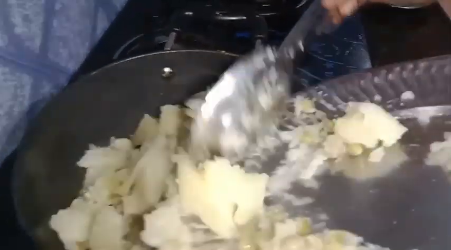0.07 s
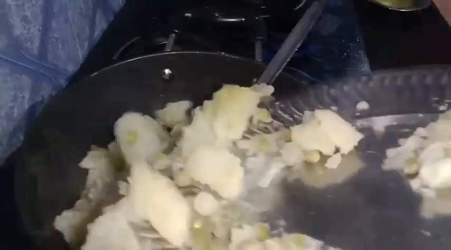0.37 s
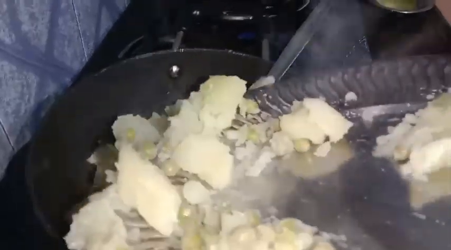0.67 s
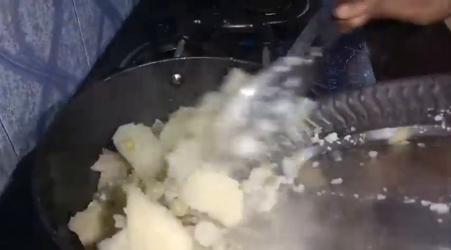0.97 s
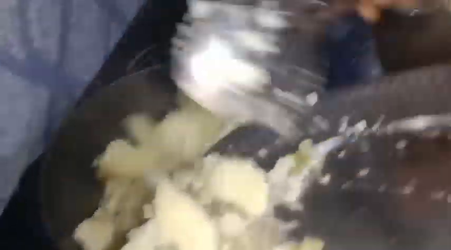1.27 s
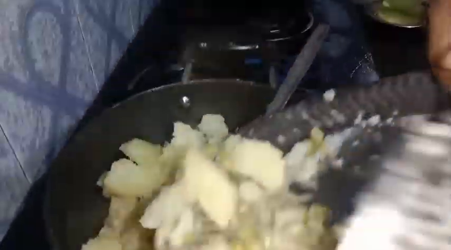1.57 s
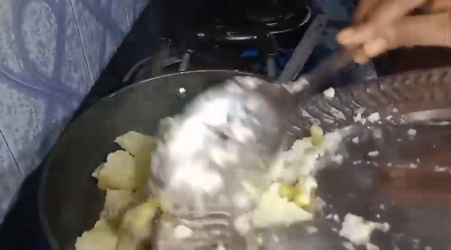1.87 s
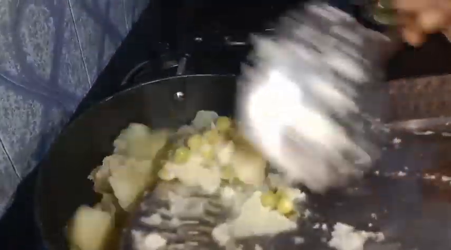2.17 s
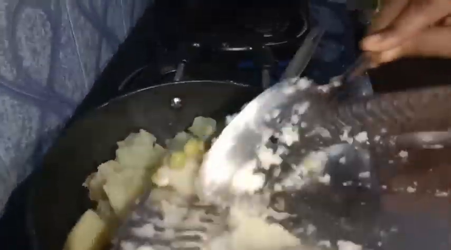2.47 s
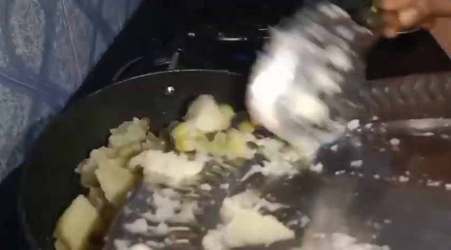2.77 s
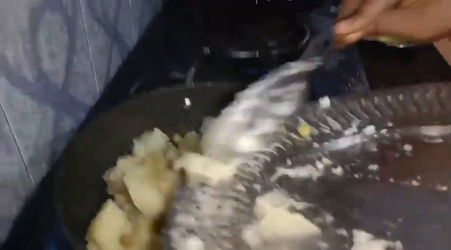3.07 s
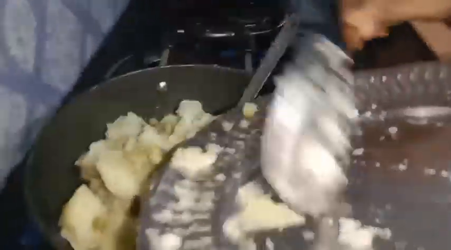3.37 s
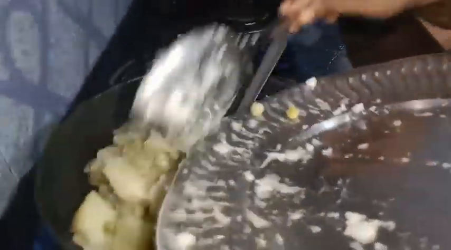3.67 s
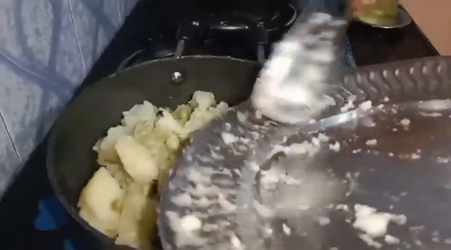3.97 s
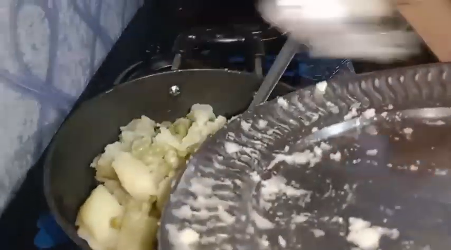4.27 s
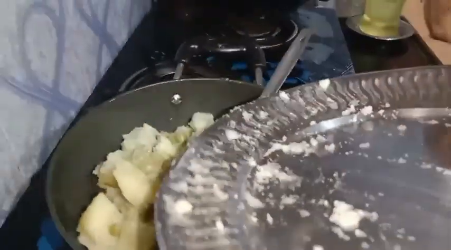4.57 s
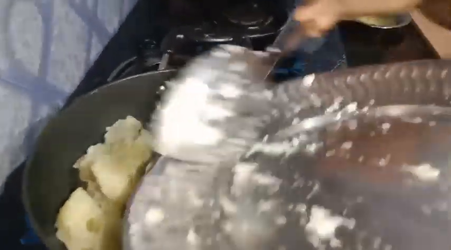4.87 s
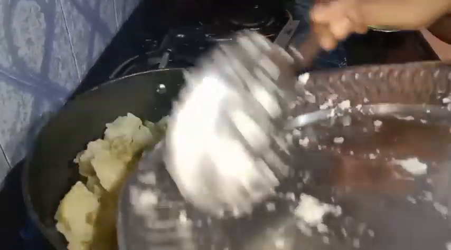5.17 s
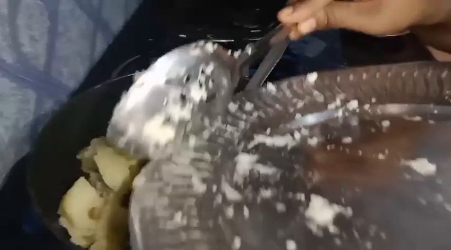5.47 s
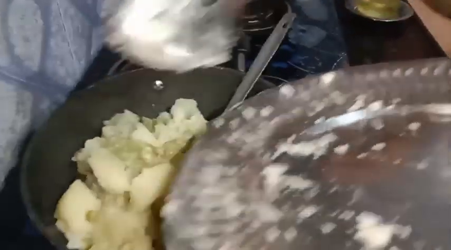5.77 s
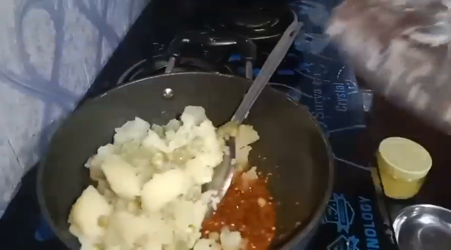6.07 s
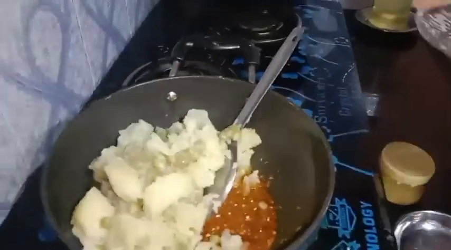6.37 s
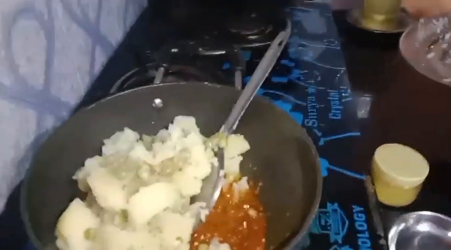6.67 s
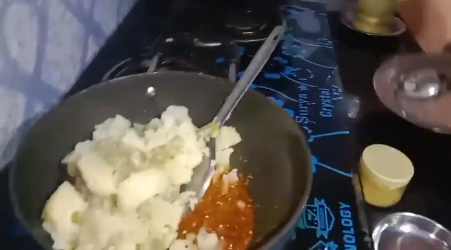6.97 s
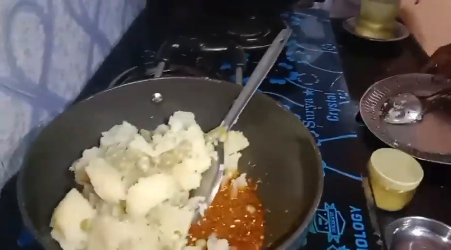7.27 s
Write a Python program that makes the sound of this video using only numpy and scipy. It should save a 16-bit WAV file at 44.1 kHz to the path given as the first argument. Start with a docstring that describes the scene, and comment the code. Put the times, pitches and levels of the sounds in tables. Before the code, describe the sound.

A metal spoon knocks and scrapes on a ringing steel plate over a faintly sizzling pan, then the plate clatters down.

```python
"""Close by in a small kitchen, a pan sizzles faintly as a slotted steel spoon starts to knock and scrape
boiled potato off a hand-held steel plate: impacts and stick-slip friction excite the plate's modes.
From 0.8 s to 3 s lumps thud into the pan, and the spoon works on. At 6.4 s the plate is put aside with
a clatter; two knocks and a light rub follow. Throughout, the microphone colours the treble and a noise
suppressor cuts off the quiet low tails."""
import sys
import numpy as np
from scipy import signal
from scipy.fft import rfft, irfft, next_fast_len
from scipy.io import wavfile
from scipy.ndimage import uniform_filter1d, map_coordinates

SR = 44100
rng = np.random.default_rng(int(sys.argv[2]) if len(sys.argv) > 2 else 0)


def wrap_up_sound(samples):
    """Save the sound to the file named by the first command line argument, as 16-bit audio."""
    columns = np.atleast_2d(samples).T
    # keep every value between -1 and 1, then stretch to whole-number steps
    tamed = np.clip(columns, -1, 1)
    steps = np.round(tamed * 32767).astype(np.int16)
    wavfile.write(sys.argv[1], SR, steps)


N = 326913

# steel strikes the plate: (time [s], level [dB], body [dB], bright edge [dB], deep ring [dB])
IMPACTS = [(0.069, -23, -16, -12, -46), (0.177, -19.5, -8, -15, -33.5), (0.635, -39.5, -13, 7, -20.5),
           (0.681, -2, -16, -9, -34.5), (0.908, -21.5, -20, 9, -29), (1.028, -4, -23.5, -10.5, -29.5),
           (1.107, -11, -27, -3.5, -30.5), (1.174, -11.5, -19, -11, -52), (1.641, -36.5, -22, 10.5, -8.5),
           (1.687, -4, -16.5, -2.5, -26), (1.769, -13, -9, -11, -25), (1.901, -17.5, -13.5, -6.5, -28),
           (2.402, -5.5, -11.5, -4.5, -22.5), (2.443, -8, -12, -6, -22), (2.462, -13.5, -11, -4.5, -14),
           (2.608, -5.5, -21, -11, -29.5), (2.722, -30, -29.5, 6, -41.5), (2.975, -2.5, -15, -8, -21.5),
           (3.007, -13, -10.5, -8, -16), (3.036, -10.5, -14, -21.5, -24.5), (3.546, -11, -8, -1, -20.5),
           (3.587, -13.5, -10, -5.5, -26), (3.623, -26.5, -19, 4.5, -2.5), (3.664, -1.5, -15.5, -7, -29.5),
           (3.730, -19.5, -10, -7, -28), (4.063, -2.5, -18.5, -11, -26), (4.116, -15.5, -17, -6, -26),
           (4.169, -6.5, -14.5, -12, -38), (4.182, -9, -20, -16, -40), (4.638, -6, -15.5, -6.5, -26.5),
           (4.716, -4, -14.5, -10.5, -37.5), (4.982, 0, -22.5, -8.5, -37.5), (5.059, -9, -15.5, -4, -34.5),
           (5.362, -6, -14, -4.5, -21.5), (5.412, -2, -19.5, -4.5, -25), (5.474, -9.5, -13, -9, -21),
           (5.493, -1.5, -11, -7, -30.5), (5.514, -6, -13, -16, -27.5), (5.566, -9.5, -10.5, -4, -37),
           (5.587, -5.5, -17, -10.5, -34), (6.191, -9, -15.5, -10, -40.5), (6.258, -15, -10.5, -10, -42),
           (6.703, -17.5, -16, -13, -37.5), (7.401, -10.5, -9, -13, -37.5)]
# tilting the plate shifts its two deep modes: (time [s], dish mode over rim mode [dB])
TILT_BALANCE = [(1.1, 6), (2.4, 5.5), (2.65, -7.5), (3.0, 9), (3.5, -16), (4.1, -6), (5.0, -18),
                (5.4, -2.5), (6.2, -22.5)]
# the plate's other strong modes: (frequency [Hz], level [dB], t60 [s])
PLATE_MODES = [(162.1, -6.5, 0.454), (206.8, 0.5, 0.21), (245.4, -8, 0.11), (297.6, -3, 0.17),
               (555.7, -8.5, 0.24), (708, -5, 0.16), (811, -2.5, 0.27), (928, -9, 0.082), (1001, -4.5, .23),
               (1208, -12.5, 0.202), (1603, -2.5, 0.19), (1782, -3, 0.19), (2000, -1, 0.15),
               (2093, -0.5, 0.25), (2153, 1, 0.22), (2245, 2.5, 0.19), (2420, 2, 0.27), (2446, 3, 0.24),
               (2620, 1.5, 0.15), (2760, -5, 0.3), (2880, -2, .18)]
# the first crack of a contact: (frequency [Hz], level [dB])
CRACK_SPECTRUM = [(40, -41), (120, -18.5), (300, -5.5), (550, -16.5), (800, -9.5), (1300, -16), (1800, -13),
                  (2400, 2.5), (2950, -6.5), (3800, -14.5), (7000, -12), (15000, -13.5)]
# spoon strokes: (start [s], length [s], pressure [dB], edge hiss [dB], swell from start to end [dB])
SCRAPE_STROKES = [(0.714, 0.094, -25.5, -28, 12.5), (0.852, .16, -35, -23, 3),
                  (1.054, 0.14, -22.5, -27, 3.5), (1.712, 0.12, -24.5, -28.5, 4.5),
                  (1.893, 0.058, -27, -29, -1), (2.467, 0.12, -25.5, -30.5, -9.5),
                  (2.645, 0.042, -31, -36.5, -5), (3.022, .04, -23, -37.5, -9),
                  (3.091, 0.1, -30.5, -35.5, 9), (3.69, 0.0425, -24, -31, 2), (4.102, 0.082, -24, -30, 8),
                  (4.657, 0.12, -27, -39.5, -1), (4.805, 0.13, -29, -20.5, 1.5),
                  (5.008, .075, -23, -27.5, 4), (5.377, 0.014, -22, -45, -8),
                  (5.427, 0.17, -19.5, -29, -0.5), (5.63, 0.023, -21.5, -24, 3)]
# hiss of the spoon's edge: (frequency [Hz], level [dB])
EDGE_SPECTRUM = [(300, -40), (1300, -26), (2400, -11), (3600, -8.5), (6000, -3), (8300, 0.5), (11000, -1.5),
                 (15000, -2)]
# the plate touches several times as it is set down: (time [s], level [dB])
SET_DOWN_CONTACTS = [(6.412, -13.5), (6.419, -13.5), (6.428, -12.5), (6.44, -20.5), (6.456, -18.5),
                     (6.478, -39)]
# potato lands in the pan: (time [s], level [dB])
LANDINGS = [(0.803, -9.5), (0.812, -12), (1.025, -16.5), (2.462, -18), (3.006, -16), (3.022, -16)]
# thud of a lump: (frequency [Hz], level [dB])
THUD_SPECTRUM = [(40, -46), (130, -18.5), (300, -2.5), (450, -8), (800, 1), (1200, -16), (2000, -25),
                 (5000, -45.5)]
# light rubs that do not ring the plate: (start [s], length [s], level [dB], swell [dB])
RUB_STROKES = [(0.0, 0.043, -40, 1), (0.066, .055, -33, -0.5), (0.194, .16, -34.5, 3.5),
               (6.973, 0.072, -41.5, 4)]
# dull grit of a rub: (frequency [Hz], level [dB])
RUB_SPECTRUM = [(150, -29), (450, -24.5), (600, -9.5), (800, -1), (1100, -7), (1800, -9.5), (2300, -2),
                (2700, 4.5), (3200, -4), (3600, -10.5), (5500, -13.5), (9000, -16), (15000, -24.5)]
# the oil flares up and settles: (time [s], level [dB], settling time [s])
OIL_FLARES = [(-.15, -34.5, 0.18), (1.2, -40.5, 1.86), (5.55, -42.5, .2), (6.3, -47.5, 1.3)]
# bubbles bursting in the oil: (frequency [Hz], level [dB])
OIL_SPECTRUM = [(40, -29.5), (400, -9.5), (1100, -13), (1600, -8), (2100, -2.5), (2700, 6.5), (3500, -3),
                (6000, 1), (9000, -2.5), (15000, -2.5)]
# reverberation time of the kitchen: (frequency [Hz], t60 [s])
ROOM_DECAY = [(150, 0.33), (1000, 0.44), (3000, 0.39), (8000, 0.31), (15000, 0.084)]
# microphone response: (frequency [Hz], gain [dB])
MIC_RESPONSE = [(25, -18), (60, -9.5), (130, -1), (200, 0), (4200, 0), (4700, -6.5), (5200, -1.5),
                (5600, 2.5), (7000, 2), (8700, 1), (9600, -7), (11300, -12), (12800, -8.5), (14000, -13.5),
                (15200, -10), (15500, -10), (15800, -30)]
# noise suppressor threshold: (frequency [Hz], level per bin [dB])
GATE_THRESHOLD = [(100, -67), (400, -56), (1000, -61), (1600, -94), (2500, -100)]

RIM_MODE, DISH_MODE, PAN_MODE = (344, 0.38), (419, 0.27), (812, 0.17)  # (frequency [Hz], t60 [s])
CLANK_HZ, CLANK_SCATTER = 2460, .07  # centre of the clank; relative spread from spot to spot
GRIP_S, SCRAPE_LIFT_T60_S, RUB_LIFT_T60_S = .015, .11, .1  # the spoon bites, then fades as it lifts
CATCH_DB, CATCH_PER_S = 2, 45  # a sliding spoon catches and frees itself in spurts
SIZZLE_REST_DB, FLARE_RISE_S = -53, 0.13
TOP_HZ = 16000
TIME = np.arange(N) / SR
RING_TIME = np.arange(SR * 3 // 5) / SR  # time within one ring [s]


def knocks(modes):
    """Impact excitation: a tick, a crack, then free vibration; the place of contact sets the timbre."""
    out = np.zeros(N)
    for start, db, body_db, edge_db, deep_db in IMPACTS:
        tick = amp(-4) * burst([(1500, -27), (6000, 0.5), (15000, -1)], t60=0.012)
        crack = amp(-5.5) * burst(CRACK_SPECTRUM, t60=0.055)
        blow = tick + crack + amp(-30.5) * plate_ring(modes, scatter_db=3.0)
        clank_hz = CLANK_HZ * np.exp(CLANK_SCATTER * rng.standard_normal())
        clank = [(clank_hz / 1.27, 2), (clank_hz, 1.5), (clank_hz * 1.23, 1)]
        # a blow that moves the whole plate also thumps
        tone = [(200, deep_db + 19.0), (800, body_db + 16), *clank, (6000, edge_db + 5.5)]
        tilt_db = np.interp(start, *np.transpose(TILT_BALANCE)) / 2
        rim = amp(deep_db - tilt_db - 3.5) * damped_mode(*RIM_MODE)
        dish = amp(deep_db + tilt_db - 4.5) * damped_mode(*DISH_MODE)
        add(out, start, amp(db + 1.24) * (colour(blow, tone) + rim + dish))
    return out


def plate_modes(upper_db, upper_t60, count=140):
    """Normal modes of the plate, one a row: the strong low ones, then many weak high ones."""
    upper = [(hz, upper_db, upper_t60 * np.sqrt(5000 / hz)) for hz in rng.uniform(1900, 15500, count)]
    hz, db, t60 = np.array(PLATE_MODES + upper).T[:, :, None]
    return amp(db) * damped_mode(hz, t60)


def plate_ring(modes, scatter_db, detune=0.0049):
    """Modal superposition: each spot has its own weights; loading by spoon and potato shifts the pitch."""
    weights = amp(rng.normal(0, scatter_db, len(modes))) * rng.choice([-1, 1], len(modes))
    pitch_ratio = 1 + detune * rng.standard_normal()
    return np.interp(RING_TIME * pitch_ratio, RING_TIME, weights @ modes)


def scrapes(modes, spots=4):
    """Stick-slip friction: coarse slips of the spoon ring the plate, fine ones hiss at its edge."""
    pressure, hiss = np.zeros(N), np.zeros(N)
    for start, length, pressure_db, hiss_db, swell_db in SCRAPE_STROKES:
        pressure += stroke(start, length, pressure_db, swell_db, SCRAPE_LIFT_T60_S)
        hiss += stroke(start, length, hiss_db, swell_db, SCRAPE_LIFT_T60_S)
    judder = unit(amp(2.0 * wobble(130) + CATCH_DB * wobble(CATCH_PER_S)))
    slips = pressure * judder * grains(rate=1600, spread_db=1.5)
    rasp = np.zeros(N)
    for k in range(spots):  # the spoon travels from spot to spot
        crack = amp(-2.5) * burst(CRACK_SPECTRUM, t60=.03)
        ring = amp(-32) * plate_ring(modes, scatter_db=3.0)
        response = crack + ring + amp(-33) * damped_mode(*DISH_MODE)
        nearness = np.maximum(0, np.cos(2 * np.pi * (3 * TIME + k / spots)))
        rasp += signal.fftconvolve(slips * nearness, response / np.linalg.norm(response))[:N]
    tone = [(160, -3.5), (300, -8.5), (1000, -2.5), (2200, 3), (3200, 1.0), (4200, 6.5), (6000, -3)]
    # the contact squeaks at ever-changing pitches as the edge moves
    squeaks = patchy(grains(rate=13000, spread_db=2.5), depth_db=5.5)
    edge = unit(colour(squeaks, EDGE_SPECTRUM))
    return amp(-2.0) * patchy(colour(rasp, tone), depth_db=2.5) + amp(2.5) * hiss * judder * edge


def stroke(start, length, db, swell_db, lift_t60):
    """Envelope of sliding friction: the contact grips, swells or sags evenly, and lifts off."""
    t = np.arange(SR) / SR - GRIP_S
    grip = np.clip(t / GRIP_S + 1, 0, 1)
    slide_db = db + swell_db * (np.clip(t / length, 0, 1) - .5)
    lift_db = -60 * np.maximum(t - length, 0) / lift_t60
    gain = np.zeros(N)
    add(gain, start - GRIP_S, grip * amp(slide_db + lift_db))
    return gain


def plate_clatter(modes):
    """Repeated impact: the emptied plate is set down further off, and its lowest mode booms."""
    out = np.zeros(N)
    for start, db in SET_DOWN_CONTACTS:
        crack = amp(-5.5) * burst(CRACK_SPECTRUM, t60=0.17)
        ring = amp(-26.5) * plate_ring(modes, scatter_db=0.5)
        add(out, start, amp(db) * (crack + ring))
    boom = amp(-46.0) * damped_mode(PLATE_MODES[0][0], t60=.45)
    add(out, SET_DOWN_CONTACTS[0][0], boom)
    return colour(out, [(160, -0.5), (230, -12), (350, 3), (700, -5), (1500, 8.5), (2400, 2.5),
                        (3200, 2), (6000, -1.5), (14000, -2.0)])


def lumps():
    """Inelastic impact: soft potato lands in the pan with a short thud and little treble."""
    out = np.zeros(N)
    for start, db in LANDINGS:
        add(out, start, amp(db - 5.5) * burst(THUD_SPECTRUM, t60=0.071))
    return out


def rubs():
    """Light sliding friction: each grain of contact gives a dull puff and rings the pan briefly."""
    level = sum(stroke(*rub, RUB_LIFT_T60_S) for rub in RUB_STROKES)
    slips = grains(rate=1500, spread_db=2.5)
    response = burst(RUB_SPECTRUM, t60=0.042) + amp(-23) * damped_mode(*PAN_MODE)
    grit = signal.fftconvolve(slips, response)[:N]
    return amp(1.5) * level * unit(grit * amp(CATCH_DB * wobble(CATCH_PER_S)))


def sizzle():
    """Shot noise: many fine bubbles burst in the oil, with sparse louder spits."""
    activity = amp(SIZZLE_REST_DB)
    for start, db, settle_s in OIL_FLARES:
        age = np.maximum(TIME - start, 0)
        activity = activity + amp(db) * (1 - np.exp(-age / FLARE_RISE_S)) * np.exp(-age / settle_s)
    level = activity * amp(0.95 * wobble(13))
    bubbles = patchy(grains(rate=7000, spread_db=-0.5), depth_db=2)
    spits = amp(-13.5) * grains(rate=41, spread_db=1.5)
    return amp(3.0) * level * unit(colour(bubbles + spits, OIL_SPECTRUM))


def kitchen_reverb(x):
    """Reverberation: diffuse reflections from tiled walls decay exponentially, the treble first."""
    hz, t, noise = signal.stft(rng.standard_normal(len(RING_TIME)), SR, nperseg=256)
    decay = amp(-60 * t / along(ROOM_DECAY, hz)[:, None])
    tail = signal.istft(noise * decay, SR, nperseg=256)[1]
    tail = np.pad(tail / np.linalg.norm(tail), (round(.006 * SR), 0))  # arrives 6 ms late
    return signal.fftconvolve(x, tail)[:N]


def damped_mode(hz, t60):
    """Damped harmonic motion of one mode after a blow."""
    return np.sin(2 * np.pi * hz * RING_TIME) * amp(-60 * RING_TIME / t60)


def burst(spectrum, t60):
    """Exponential decay of a puff of coloured noise that starts near rms 1."""
    fade = amp(-60 * RING_TIME / t60) * (1 - np.exp(-RING_TIME / 0.00027))
    puff = fade * colour(rng.standard_normal(len(RING_TIME)), spectrum)
    return puff * np.linalg.norm(fade) / np.linalg.norm(puff)


def grains(rate, spread_db):
    """Poisson process: tiny impulses of uneven size, on average rate a second, rms 1."""
    size = amp(spread_db * np.minimum(rng.exponential(size=N), 4))
    return unit((rng.random(N) < rate / SR) * size * rng.standard_normal(N))


def patchy(x, depth_db):
    """Time-varying filtering: short-lived resonances come and go across the spectrum."""
    spectra = signal.stft(x, nperseg=512)[2]
    field = uniform_filter1d(rng.standard_normal(spectra.shape), size=2, axis=0)
    field = uniform_filter1d(field, size=8, axis=1)
    gain = unit(amp(depth_db * unit(field)))
    return signal.istft(spectra * gain, nperseg=512)[1][:N]


def wobble(rate):
    """Spline interpolation: a smooth random curve, rate knots a second."""
    return map_coordinates(rng.standard_normal(int(N * rate / SR) + 4), [np.arange(N) * rate / SR])


def colour(x, points):
    """Minimum-phase filtering through points of (frequency [Hz], gain [dB])."""
    size = 2 * next_fast_len(len(x) // 2 + 4096)
    gain = amp(along(points, np.fft.rfftfreq(size, 1 / SR)))
    cepstrum = irfft(np.log(gain))
    cepstrum[1:size // 2] *= 2  # folding onto positive time makes the filter causal
    cepstrum[size // 2 + 1:] = 0
    return irfft(rfft(x, size) * np.exp(rfft(cepstrum)), size)[:len(x)]


def along(points, hz):
    """Interpolation of (frequency [Hz], value) points on a logarithmic frequency axis."""
    knots_hz, values = np.transpose(points)
    return np.interp(np.log(hz + 1), np.log(knots_hz + 1), values)


def add(track, start, sound):
    """Superposition of a sound on a track from start [s]."""
    i = max(0, round(start * SR))
    track[i:i + len(sound)] += sound[:max(0, N - i)]


def amp(db):
    """Decibel law: level to amplitude ratio."""
    return 10 ** (np.asarray(db) / 20)


def unit(x):
    """Normalisation to rms 1."""
    return x / np.sqrt(np.mean(x ** 2) + 1e-20)


def scene():
    """Direct and reverberant sound add; the further source has the larger share of reverberation."""
    modes = plate_modes(upper_db=-9.0, upper_t60=0.092)
    near = knocks(modes) + scrapes(modes) + rubs() + lumps()
    far = plate_clatter(modes)
    room = kitchen_reverb(amp(-10.5) * near + amp(-7.5) * far)
    return (near + far + room + sizzle())[None]


def record(dry):
    """Transduction: microphone colour, spectral gating of quiet bands, soft saturation, band limit."""
    hz, _, spectra = signal.stft(colour(dry[0], MIC_RESPONSE), SR, nperseg=1024)
    power = np.abs(uniform_filter1d(np.abs(spectra) ** 2, size=7, axis=0))
    excess = (power / amp(along(GATE_THRESHOLD, hz))[:, None] ** 2) ** 2
    shut_gain = amp(-10)
    gate = shut_gain + (1 - shut_gain) * excess / (1 + excess)
    gated = signal.istft(spectra * gate, SR, nperseg=1024)[1][:N]
    saturated = gated / (1 + np.abs(gated / .85) ** 4) ** (1 / 4)
    size = next_fast_len(N + SR // 2)
    passband = np.fft.rfftfreq(size, 1 / SR) < TOP_HZ
    return irfft(rfft(saturated, size) * passband, size)[None, :N]


dry = scene()
out = record(dry)
wrap_up_sound(out)
```